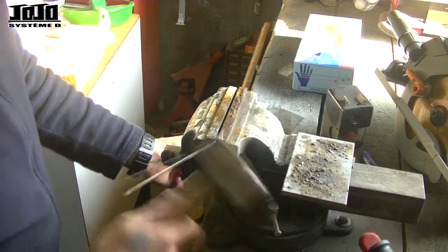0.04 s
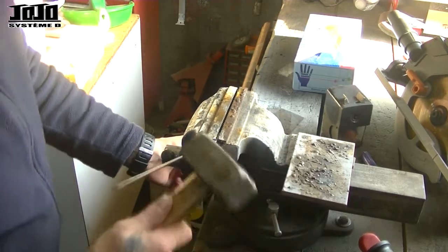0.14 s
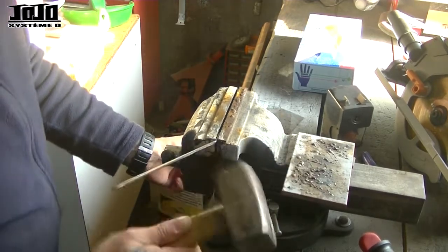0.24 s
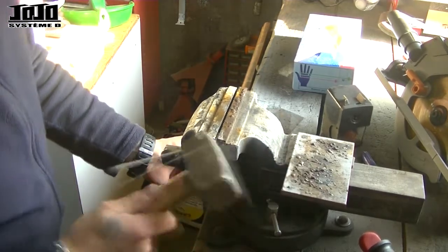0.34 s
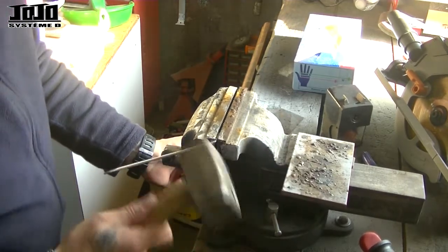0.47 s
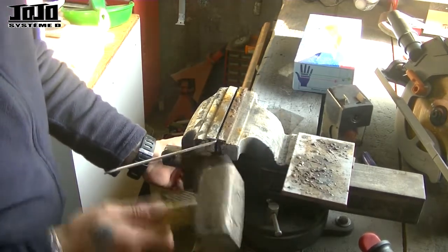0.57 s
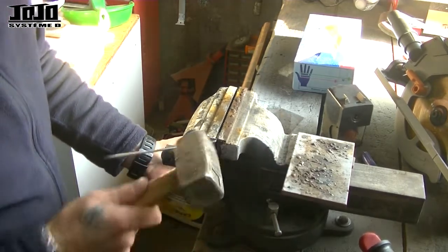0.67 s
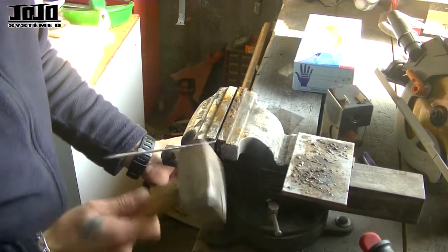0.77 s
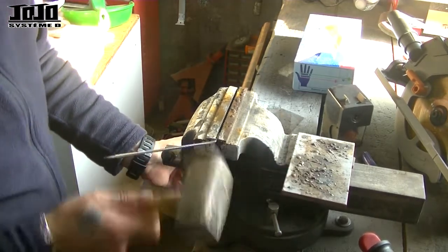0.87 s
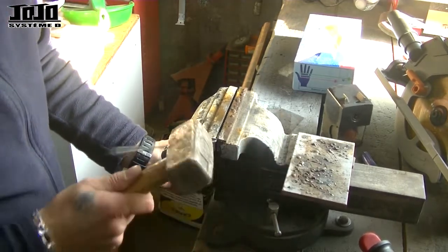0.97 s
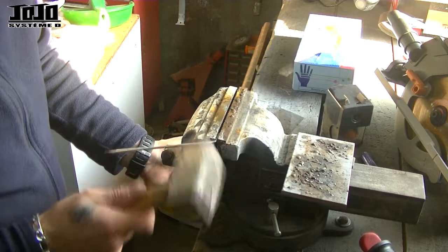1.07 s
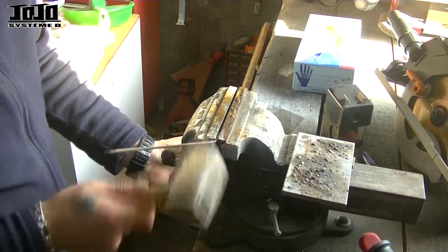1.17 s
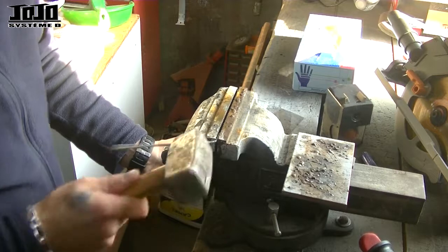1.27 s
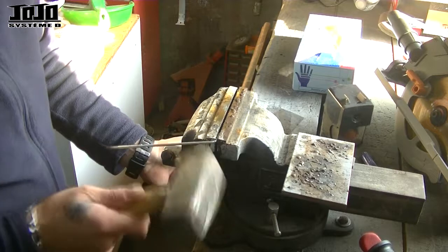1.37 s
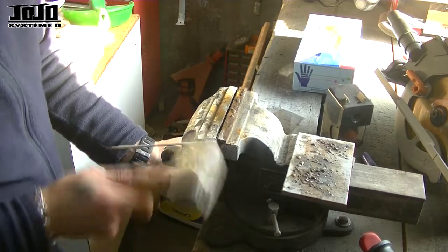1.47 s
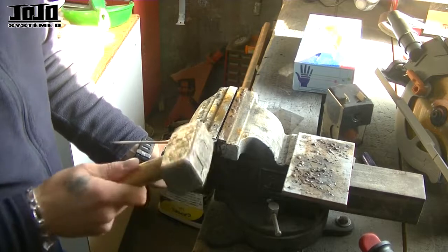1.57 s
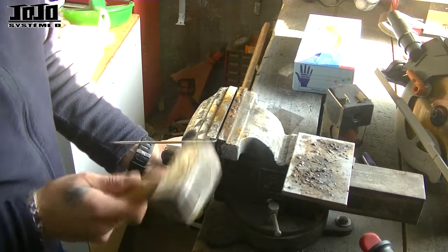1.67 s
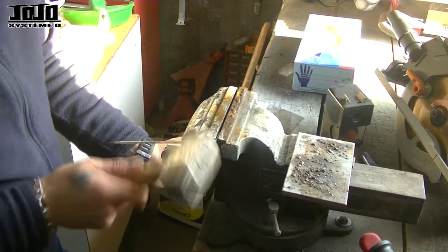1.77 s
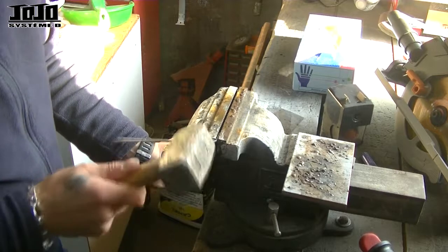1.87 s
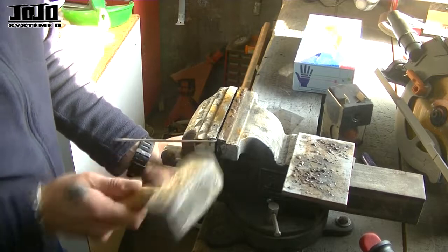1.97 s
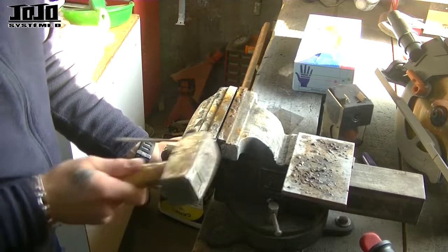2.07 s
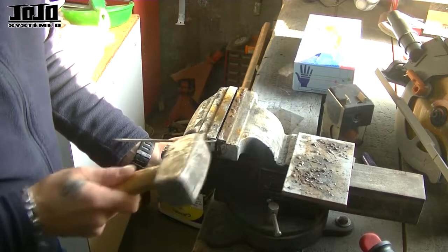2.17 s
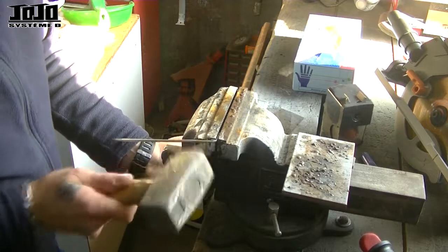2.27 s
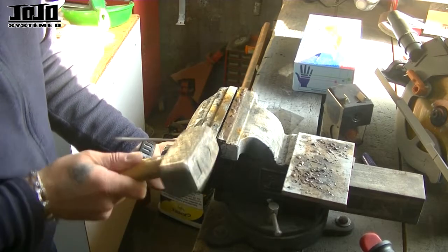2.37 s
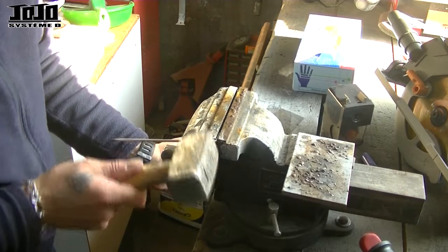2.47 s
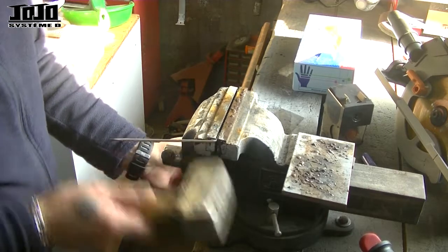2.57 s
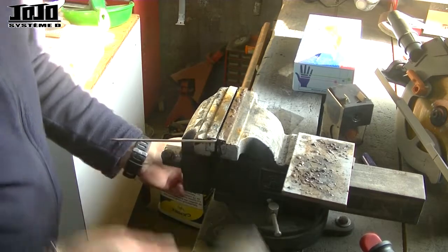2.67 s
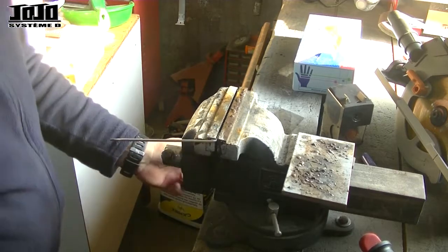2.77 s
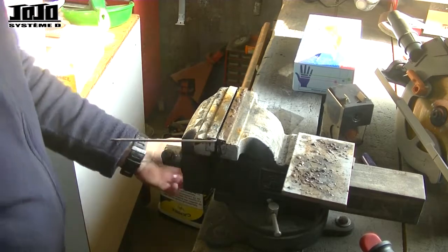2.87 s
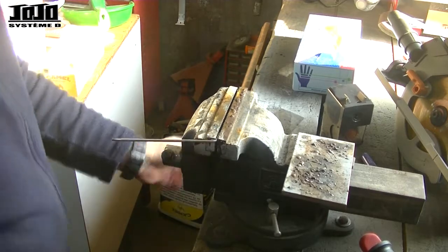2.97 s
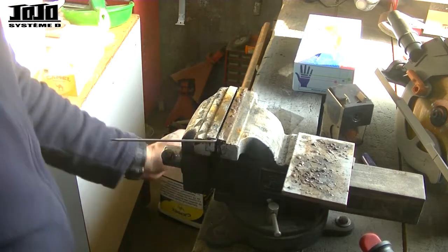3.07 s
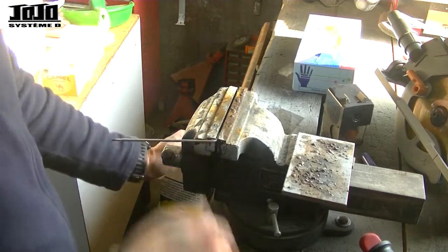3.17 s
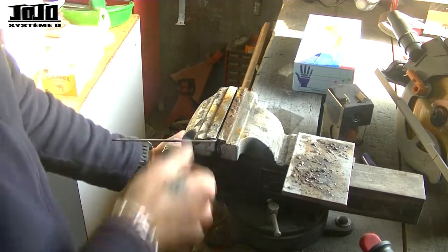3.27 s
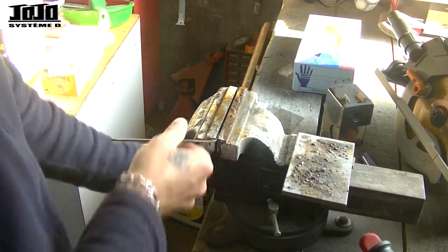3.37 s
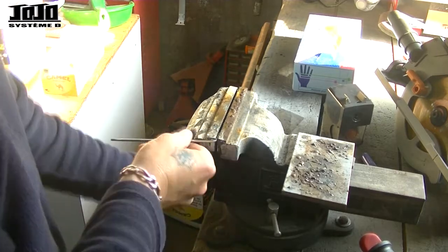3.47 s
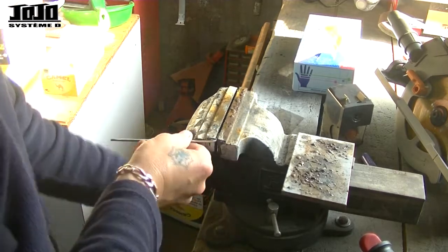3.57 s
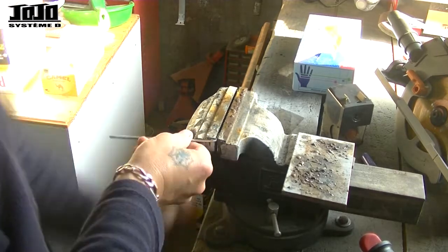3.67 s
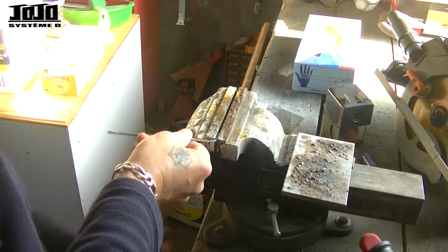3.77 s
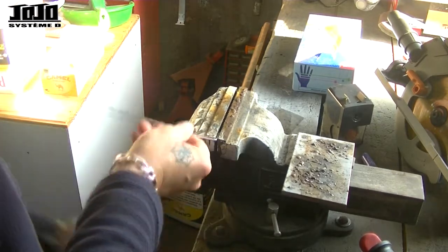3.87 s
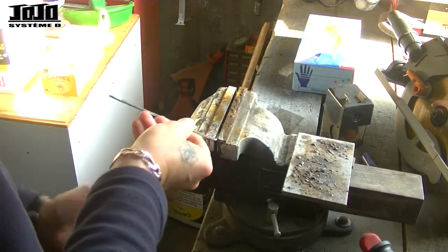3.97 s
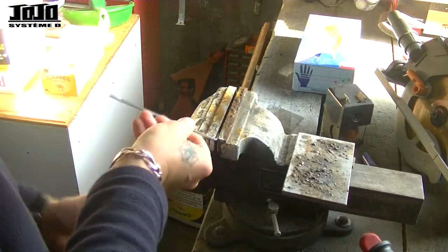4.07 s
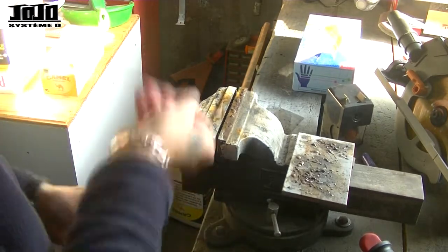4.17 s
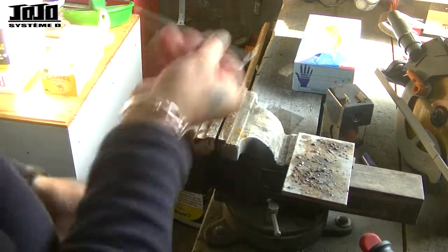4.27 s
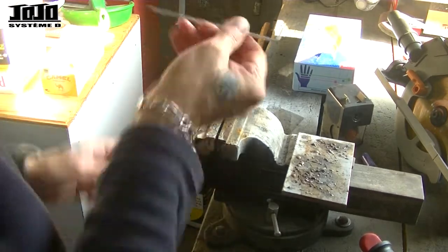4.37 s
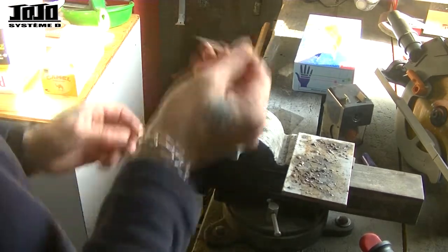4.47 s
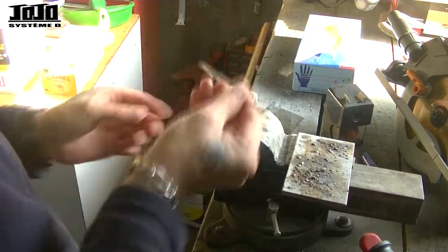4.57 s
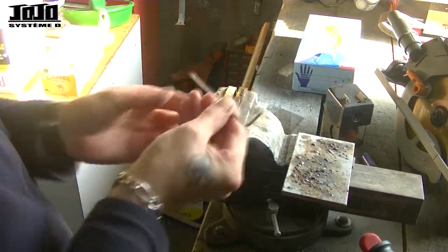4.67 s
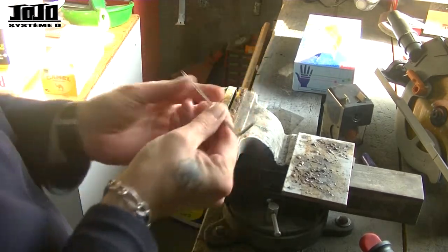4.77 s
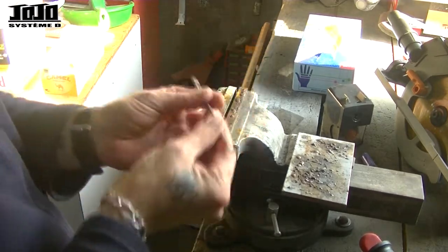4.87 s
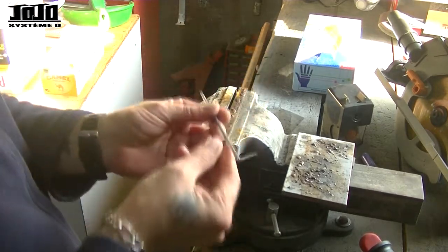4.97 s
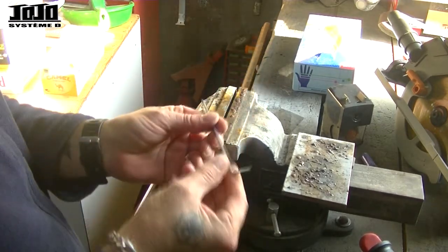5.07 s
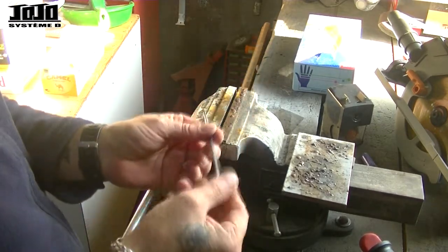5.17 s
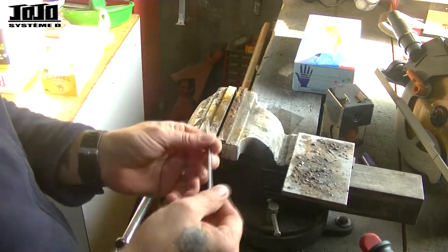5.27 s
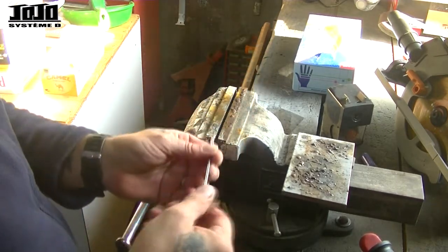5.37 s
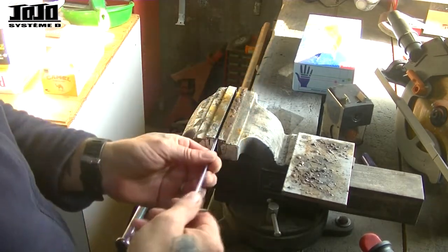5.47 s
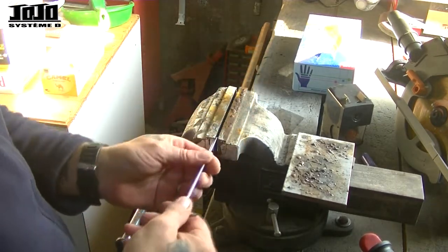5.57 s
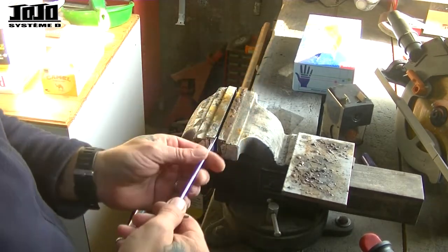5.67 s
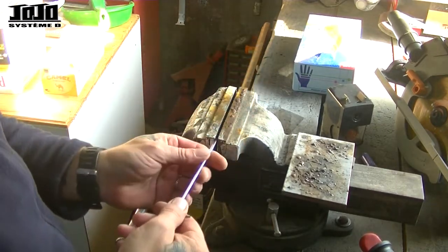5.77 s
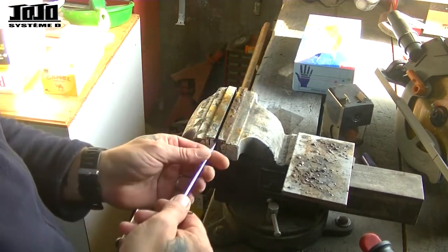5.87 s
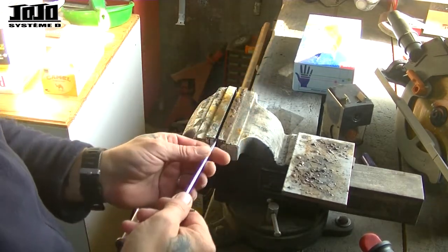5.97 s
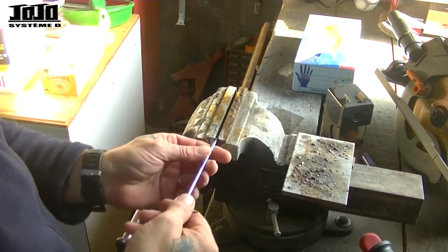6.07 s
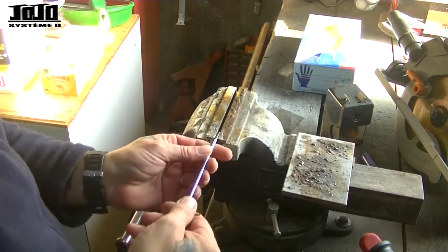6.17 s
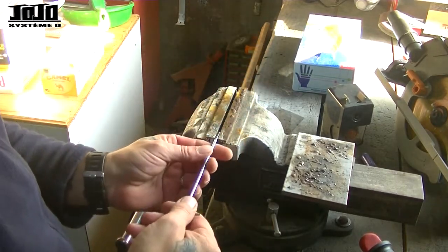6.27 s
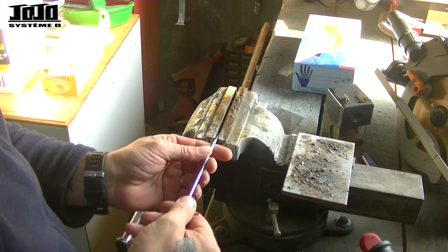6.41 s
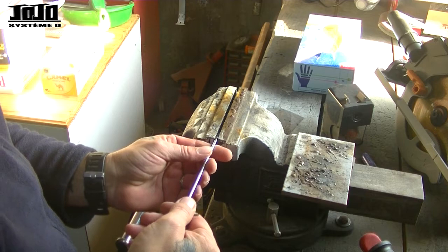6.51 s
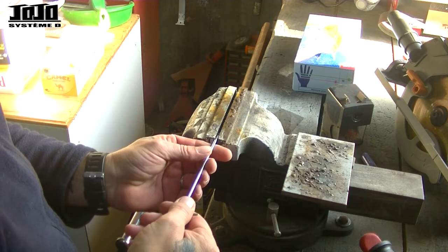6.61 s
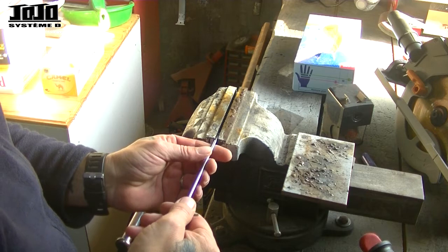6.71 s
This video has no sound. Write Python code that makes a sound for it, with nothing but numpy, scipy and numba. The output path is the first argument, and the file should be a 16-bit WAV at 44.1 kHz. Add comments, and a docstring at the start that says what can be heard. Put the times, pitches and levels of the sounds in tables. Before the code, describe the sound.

From the start, a hammer strikes a thin steel rod in a vise, nine sharp blows at about three a second, ending near 2.4 seconds. Each has a crack, a bright short ring and a slight bench thud, sounding a little squashed and growing harder as they go. A small steel tick follows at 2.7 seconds and a faint, high bracelet jingle at 2.9. The hammer touches the bench and lands with a loud clack at 3.1. Light ticks and faint scrapes lead to a cluster of louder clinks around 4.1 to 4.2 seconds as the rod comes out. Soft sliding follows near 5 seconds, then scattered small metal ticks from 5.5 to 6.6. The close stereo microphone catches the workshop's short echo, a steady low hiss, and faint rapid focus motor ticking near 3.9 seconds and again from 6 seconds.

```python
"""Sharp, ringing blows: a club hammer bends a thin steel rod over a vise jaw in a hard-walled workshop.
Each is a crack, ringing steel and a bench thud; then the hammer is dropped on the bench.
The rod is drawn out of the jaws and set in again with small steel ticks and scrapes.
A close stereo camera microphone adds hiss and its focus motor's steps, 25 a second;
its limiter squeezes every blow."""
import sys
import numpy as np
from scipy import signal
from scipy.fft import rfft, irfft, next_fast_len
from scipy.io import wavfile
from scipy.ndimage import uniform_filter1d
from numba import njit

SR = 44100
rng = np.random.default_rng(int(sys.argv[2]) if len(sys.argv) > 2 else 0)


def unload_wav(signal):
    """Save mono or channel-first audio to the path in sys.argv[1] as 16-bit WAV at rate SR, clipped to [-1, 1]."""
    wavfile.write(
        sys.argv[1],
        SR,
        np.round(np.clip(np.atleast_2d(signal).T, -1, 1) * 32767).astype(np.int16),
    )


N = 297406
PREROLL = SR // 2  # samples before time zero


def amp(db):
    """dB to gain."""
    return 10 ** (np.asarray(db) / 20)


def unit_rms(x):
    """Scale to rms 1."""
    return x / np.sqrt(np.mean(x ** 2) + 1e-20)


def curve(points, hz):
    """Interpolate (freq_hz, value) points on a log axis."""
    freqs, values = np.transpose(points)
    return np.interp(np.log(hz + 1), np.log(freqs + 1), values)


def filtered(x, response):
    """Apply a complex frequency response."""
    n = x.shape[-1]
    size = next_fast_len(n + 8192)
    return irfft(rfft(x, size) * response(np.fft.rfftfreq(size, 1 / SR)), size)[..., :n]


def resonances(peaks):
    """Response of (freq_hz, width_hz, level_db) band-passes of alternating sign."""
    return lambda hz: sum((-1) ** k * amp(db) * 1j * hz * width / (centre**2 - hz**2 + 1j * hz * width)
                          for k, (centre, width, db) in enumerate(peaks))


def stereo_pair(spectra, hz, correlation):
    """Mix two independent noise spectra to a given left-right correlation."""
    angle = np.arccos(np.clip(curve(correlation, hz), -1, 1))[:, None] / 2
    mid, side = np.cos(angle) * spectra[0], np.sin(angle) * spectra[1]
    return np.array([mid + side, mid - side])


def add(out, start_s, x):
    """Mix mono or stereo x into a track with preroll."""
    span = out[:, PREROLL + round(start_s * SR):][:, :x.shape[-1]]
    span += x[..., :span.shape[1]]


def onset(t, rise_s):
    """Soft start of a contact."""
    return (1 - np.exp(-t / rise_s)) ** 2


def ringing(modes, t, rise_s, scatter_db, blur_hz):
    """Damped sines of random strength; a wandering phase blurs each line."""
    hz, db, t60_s = np.transpose(modes)[:, :, None]
    db = db + scatter_db * rng.standard_normal(hz.shape)
    phase = rng.uniform(0, 2 * np.pi, hz.shape)
    hop = 64
    walks = np.cumsum(rng.standard_normal((len(modes), len(t) // hop + 1)), axis=1)
    walks *= np.sqrt(2 * np.pi * blur_hz * hop / SR)
    phase = phase + np.array([np.interp(np.arange(len(t)) / hop, np.arange(len(w)), w) for w in walks])
    return (amp(db - 60 * t / t60_s) * np.sin(2 * np.pi * hz * t + phase)).sum(0) * onset(t, rise_s)


def crack(t, rise_s, decay_s, colour_db):
    """Contact noise: a decaying burst, whitened, then coloured."""
    envelope = onset(t, rise_s) * amp(-60 * t / decay_s)
    spectrum = rfft(rng.standard_normal(len(t)) * envelope)
    hz = np.fft.rfftfreq(len(t), 1 / SR)
    power = uniform_filter1d(np.abs(spectrum) ** 2, size=round(150 * len(t) / SR))
    burst = irfft(spectrum / np.sqrt(np.abs(power)) * amp(colour_db(hz)), len(t))
    burst *= onset(t, rise_s / 2) * np.exp(-t / decay_s)
    return burst * np.linalg.norm(envelope) / np.linalg.norm(burst)


# room decay: freq_hz, t60_s
ROOM_T60 = [(150, 0.46), (500, 0.55), (1500, 0.57), (4000, 0.4), (8000, 0.44), (14000, 0.25)]
# room tail, left to right: freq_hz, correlation
ROOM_CORRELATION = [(60, 0.39), (180, 0.95), (550, 0.98), (1650, 0.78), (4970, 0.58), (15000, 0.18)]


def in_workshop(dry, wet_db, left_db=0, tail_samples=SR * 2 // 3):
    """Direct sound plus a fresh noise tail, each frequency dying at its own rate."""
    hz, t, noise = signal.stft(rng.standard_normal((2, tail_samples)), SR, nperseg=256)
    decay = amp(-60 * t / curve(ROOM_T60, hz)[:, None])
    impulse = signal.istft(stereo_pair(noise, hz, ROOM_CORRELATION) * decay, SR, nperseg=256)[1]
    impulse *= 1 - np.exp(-np.arange(impulse.shape[1]) / SR / 0.0011)  # reflections build up
    impulse *= amp(wet_db) / np.linalg.norm(impulse[0])
    impulse[:, 0] = 1  # direct path
    return signal.fftconvolve(dry[None], impulse, axes=1) * amp([[left_db / 2], [-left_db / 2]])


# microphone hiss and still air: freq_hz, density_db
HISS_SPECTRUM = [(40, -24), (150, -11), (340, -2), (450, -2), (710, -6), (1430, -5), (2970, -1), (5000, -3),
                 (10000, -8), (15300, -12), (16500, -22)]
# hiss, left to right: freq_hz, correlation
HISS_CORRELATION = [(60, -0.021), (380, -0.47), (2380, -0.11), (15000, -0.0069)]


def hiss(level_db=-57.3):
    """Steady noise of the two capsules."""
    hz, _, white = signal.stft(rng.standard_normal((2, PREROLL + N + 512)), SR, nperseg=1024)
    spectra = stereo_pair(white, hz, HISS_CORRELATION) * amp(curve(HISS_SPECTRUM, hz))[:, None]
    noise = signal.istft(spectra, SR, nperseg=1024)[1][:, :PREROLL + N]
    return amp(level_db) * noise / np.sqrt(np.mean(noise.mean(0) ** 2))


# lens barrel: freq_hz, level_db, t60_s
LENS_MODES = [(413, 1.5, 0.023), (647, -8.5, 0.12), (1027, -6.5, 0.097), (1403, 4, 0.055), (1555, 7, 0.052),
              (2080, 1.5, 0.057), (2526, 14, 0.023), (3060, 12, 0.034)]
# focus runs: start_s, step_count
MOTOR_RUNS = [(3.846, 6), (5.965, 15)]
# first steps of a run: level_db
RUN_UP_DB = [-38.5, -42, -54, -44]


def focus_motor(first_gap_s=0.053, step_s=0.0397, cruise_db=-51.5):
    """A bright kick, then soft, evenly spaced steps ring the lens barrel; no room."""
    out, t = np.zeros((2, PREROLL + N)), np.arange(SR // 8) / SR
    for start_s, step_count in MOTOR_RUNS:
        for k in range(step_count):
            delay_s = first_gap_s + (k - 1) * step_s if k else 0
            level_db = RUN_UP_DB[k] if k < len(RUN_UP_DB) else cruise_db + 3 * rng.standard_normal()
            db_per_octave = -5 if k else 3
            modes = [(hz, db + db_per_octave * np.log2(hz / 900), t60) for hz, db, t60 in LENS_MODES]
            colour = lambda hz: (db_per_octave + 2) * np.log2((hz + 300) / 900) * (hz > 600)
            step = ringing(modes, t, rise_s=0.002, scatter_db=3, blur_hz=49.4)
            step += amp(-1) * crack(t, 0.0014, 0.024, colour)
            step /= np.abs(step).max()
            add(out, start_s + delay_s, amp(level_db + 6) * step * amp([[0.4], [-0.4]]))
    return out


# bench top: freq_hz, width_hz, level_db
BENCH_MODES = [(181, 14, -8.5), (242, 41, -14), (344, 44, 2.5), (464.4, 244, -0.5), (930, 415, 0.5)]


def bench_thud(t):
    """One short push into the bench top."""
    knock = filtered(np.exp(-t / 0.00031), resonances(BENCH_MODES))
    return knock / np.abs(knock).max()


def bench_rumble(t, t60_s=0.1):
    """The bench top shakes under a heavy weight."""
    shake = rng.standard_normal(len(t)) * onset(t, 0.0099) * amp(-60 * t / t60_s)
    wood = filtered(shake, lambda hz: resonances(BENCH_MODES)(hz) / (1 + 1j * hz / 450))
    return wood / np.abs(wood).max()


# rod and vise jaws: freq_hz, level_db, t60_s
JAW_MODES = [(1855, 7.5, 0.04), (2877, 3, 0.081), (3200, 0, 0.065), (3775, -1.5, 0.11), (4205, -1.5, 0.04),
             (4310, 3.5, 0.034), (4825, -0.5, 0.074), (5300, -4, 0.21), (5700, -3.5, 0.13),
             (7040, 1, 0.014), (7700, 1, 0.025), (9100, -16, .04), (12600, -15, .04)]
# the hammer settles, the vise opens, the rod comes out and slides through the fingers:
# start_s, rise_s, fall_s, level_db, bench_db, centre_hz
SCRAPES = [(3.036, 0.028, 0.026, -36.5, 6, 3580), (3.6, 0.036, 0.98, -52.5, -13, 4160),
           (3.779, .05, 0.3, -54, -16, 3530), (4.07, 0.035, 0.25, -39.5, -3, 2770),
           (4.95, 0.27, 1.0, -52.5, -30, 4100)]


def scrapes(swing_db=28, grit_db=3.5):
    """Rough contact: noise with a grainy envelope excites the steel and the bench."""
    out, t = np.zeros((2, PREROLL + N)), np.arange(SR) / SR
    for start_s, rise_s, fall_s, level_db, bench_db, centre_hz in SCRAPES:
        peaks = [(hz, 200, db - 16 * abs(np.log2(hz / centre_hz))) for hz, db, _ in JAW_MODES]
        grains = unit_rms(uniform_filter1d(rng.standard_normal(len(t)), size=90))
        grit = rng.standard_normal((2, len(t))) * amp(grit_db * grains)
        steel = unit_rms(filtered(grit[0], resonances(peaks)))
        wood = unit_rms(filtered(grit[1], resonances(BENCH_MODES)))
        stroke_db = level_db - swing_db * np.maximum((rise_s - t) / rise_s, (t - rise_s) / fall_s) ** 2
        stroke = amp(stroke_db - 5.5) * (steel + amp(bench_db) * wood)
        add(out, start_s, in_workshop(stroke, wet_db=-0.7, left_db=2.2))
    return out


# bracelet links: freq_hz, level_db, t60_s
LINK_MODES = [(9700, -14, 0.023), (14200, -7, 0.016), (14900, -7, .02)]
# links touch: start_s, level_db
LINK_TOUCHES = [(2.897, -37), (2.905, -36), (2.912, -31), (2.917, -44)]


def bracelet():
    """Links touch in one brief, high jingle."""
    out, t = np.zeros((2, PREROLL + N)), np.arange(SR // 6) / SR
    for start_s, level_db in LINK_TOUCHES:
        ring = ringing(LINK_MODES, t, rise_s=0.00064, scatter_db=3, blur_hz=90)
        add(out, start_s, amp(level_db) * ring)
    return out


# small steel contacts: start_s, level_db, centre_hz, rise_ms
TICKS = [(2.6544, -22.5, 3900, 1.4), (2.6944, -34, 2960, 0.6), (2.9244, -46, 2390, 0.55),
         (3.4436, -43, 4400, 0.97), (3.5149, -40, 4440, 1.9), (3.5374, -45, 3500, 1.4),
         (3.6142, -36, 3740, 1.1), (3.7993, -35, 3160, 0.78), (4.098, -23, 3350, 2.2),
         (4.105, -11.5, 2860, 5.1), (4.148, -24, 3220, 2.8), (4.2, -14.5, 4200, 0.78),
         (4.2268, -11, 3440, 1.2), (4.2894, -46, 3000, 1.7), (5.506, -29.5, 4240, 0.78),
         (5.5922, -39, 3100, 2.4), (5.6471, -36, 5300, 0.55), (5.7758, -32, 4640, 4),
         (5.7877, -34, 3850, 2.2), (5.8501, -37.5, 3800, 2.2), (5.8755, -35.5, 3740, 2.4),
         (5.9254, -31.5, 3960, 2.7), (6.0312, -26.5, 4740, 1.5), (6.1285, -41, 2920, 2.5),
         (6.1539, -29.5, 4630, 2.8), (6.4557, -40, 3800, 1.2), (6.6019, -36.5, 3770, 4.3)]


def rod_ticks(held_from_s=4.6):
    """Light contacts ring the steel modes near centre_hz; softer ones click duller."""
    out, t = np.zeros((2, PREROLL + N)), np.arange(SR // 6) / SR
    for start_s, level_db, centre_hz, rise_ms in TICKS:
        rise_s = rise_ms / 1000
        t60_scale = 0.91 if start_s < held_from_s else 0.74  # loose in the jaws, then in the fingers
        rolloff_db = lambda hz: -16 * np.abs(np.log2((hz + 1) / centre_hz))
        modes = [(hz, db + rolloff_db(hz), t60 * t60_scale) for hz, db, t60 in JAW_MODES]
        ring = amp(-9.5) * ringing(modes, t, rise_s, scatter_db=2.4, blur_hz=40)
        click = amp(-6) * crack(t, rise_s, 0.041, lambda hz: (0.7 + 0.25 * rise_ms) * rolloff_db(hz))
        tick = in_workshop(ring + click, wet_db=-4, left_db=1.5, tail_samples=SR // 3)
        add(out, start_s, amp(level_db) * tick)
    return out


# hammer on the bench: freq_hz, density_db
DROP_SPECTRUM = [(60, -78.5), (170, -49.5), (340, -27.5), (880, -0.5), (2600, -5), (3400, 4), (4100, -7.5),
                 (4850, 4), (5800, -8), (9600, -21), (10300, -27), (12000, -31), (16500, -35)]
# bench contacts: start_s, level_db, rumble_db, db_per_octave
DROPS = [(2.964, -25.5, -5, -0.3), (3.0922, -2.5, -15.5, -0.3)]


def hammer_drop():
    """The hammer touches the bench, then lands: each a crack over a wooden rumble."""
    out, t = np.zeros((2, PREROLL + N)), np.arange(SR // 2) / SR
    for start_s, level_db, rumble_db, db_per_octave in DROPS:
        colour = lambda hz: curve(DROP_SPECTRUM, hz) + db_per_octave * np.log2((hz + 50) / 2000)
        impact = crack(t, 0.000083, 0.024, colour) + amp(rumble_db) * bench_rumble(t)
        add(out, start_s, amp(level_db) * in_workshop(impact, wet_db=0.73))
    return out


# rod modes: freq_hz
ROD_HZ = [1890, 1942, 2000, 2045, 3100, 3610, 3728, 3757, 3935, 4520, 5795, 6190, 6955, 7190, 7285, 7800]
# same modes: level_db, t60_s
ROD_DECAYS = [(-17, 0.24), (-1, 0.28), (-4, 0.28), (-7, 0.3), (-12.5, 0.34), (-6, 0.085), (0.5, 0.18),
              (3, 0.23), (-22, 0.43), (-4.5, 0.11), (-0.5, 0.39), (-6, 0.24), (2, 0.26), (-0.5, 0.17),
              (-0.5, 0.083), (-1.5, 0.21)]
# same modes, those of one group ring up together: group_index
ROD_GROUPS = [0, 0, 0, 0, 1, 1, 0, 1, 1, 1, 2, 2, 2, 1, 1, 0]
# hammer head: freq_hz, level_db, t60_s
HEAD_MODES = [(11840, -47, .65), (13790, -49, .35)]


def steel_ring(t, rise_s, group_db):
    """The rod's wavering modes plus the hammer head's clear, high ring."""
    modes = [(hz, db + group_db[group], t60)
             for hz, group, (db, t60) in zip(ROD_HZ, ROD_GROUPS, ROD_DECAYS)]
    rod = amp(-27.5) * ringing(modes, t, rise_s, scatter_db=1.8, blur_hz=28)
    return rod + ringing(HEAD_MODES, t, rise_s, scatter_db=1.8, blur_hz=9)


# blow on the free rod: freq_hz, density_db
FREE_SPECTRUM = [(60, -21), (150, -17.5), (410, -20), (1410, -12), (1950, -10), (3200, -7.5), (3750, -3.5),
                 (4300, -9.5), (5900, -6.5), (7300, -7), (9600, -7.5), (10200, -23.5), (11200, -15),
                 (15100, -14.5), (16500, -47.5)]
# blow through to the jaw: freq_hz, density_db
SEATED_SPECTRUM = [(60, -56), (180, -38.5), (800, -9.5), (1500, 5.5), (3860, 4.5), (5200, -5), (7000, -2.5),
                   (9600, -27), (10200, -15), (11200, -26), (13500, -14), (15500, -32.5), (16500, -31)]
# blows: start_s, level_db, seated_fraction, group0_db, group1_db, group2_db
BLOWS = [(-.178, 1, 0, 13, 5, 7.5), (0.1128, -2.5, 0.12, 6.5, 11.5, -28), (.389, -2, 0.2, 1, 6.5, -6),
         (0.68, -2, 0.18, 1.5, 7, -30), (.971, 2, 0.044, -0.5, 6.5, 2.5), (1.032, -17.5, 0.78, -25, 21, 14),
         (1.258, 1, 0.14, 0, 5.5, 0), (1.540, 2.5, 0.36, -7, 0.5, -4), (1.838, 3, 0.21, -20, 1, -0.5),
         (2.120, 7, 0.5, -18, -17.5, -35), (2.417, 5, 0.46, -10, 3.5, -7.5)]
# the face grazes the rod ahead of a blow: start_s, level_db
GRAZES = [(0.1083, -13.5), (0.677, -31), (1.241, -28), (1.829, -29.5), (2.107, -34), (2.412, -35)]


def hammer_blows(first_rise_ms=2.98, hardening_ms_per_s=1.06, thud_db=-18):
    """A crack that darkens as the rod seats on the jaw, ringing steel and a bench thud."""
    out, t = np.zeros((2, PREROLL + N)), np.arange(SR // 2) / SR
    free_colour = lambda hz: curve(FREE_SPECTRUM, hz)
    for start_s, level_db, seated, *group_db in BLOWS:
        rise_s = (first_rise_ms - hardening_ms_per_s * start_s) / 1000  # harder as the rod bends
        colour = lambda hz: (1 - seated) * free_colour(hz) + seated * curve(SEATED_SPECTRUM, hz)
        ring = steel_ring(t, rise_s, group_db)
        impact = crack(t, rise_s, 0.023 + 8 * rise_s, colour) + ring + amp(thud_db) * bench_thud(t)
        add(out, start_s, amp(level_db) * in_workshop(impact, wet_db=2.39))
        # extra dry ring keeps the steel tones clear and even
        add(out, start_s, amp(level_db + 4) * ring)
    for start_s, level_db in GRAZES:
        add(out, start_s, amp(level_db) * crack(t[:SR // 10], 0.0003, 0.089, free_colour))
    return out


# hammer balance: freq_hz, left_minus_right_db
HAMMER_BALANCE = [(60, -5.5), (120, 7.5), (240, 1.5), (480, 1.5), (950, 2), (1890, 2), (3770, 0.0),
                  (7520, 6), (15000, -3.5)]
# hammer phase: freq_hz, left_lead_rad
HAMMER_PHASE = [(3200, 0), (5250, -0.36), (6800, -1.4), (7750, -0.82), (9800, 1), (11000, -0.43)]


def hammer():
    """Blows and drop, reaching the two capsules at unequal level and phase."""
    sides = np.array([[0.5], [-0.5]])
    gain = lambda hz: amp(curve(HAMMER_BALANCE, hz) * sides)
    phase = lambda hz: curve(HAMMER_PHASE, hz) * sides
    return filtered(hammer_blows() + hammer_drop(), lambda hz: gain(hz) * np.exp(1j * phase(hz)))


def scene():
    """Stereo sum of all sources, preroll removed."""
    return (hammer() + rod_ticks() + bracelet() + scrapes() + focus_motor() + hiss())[:, PREROLL:]


@njit
def follow(level, attack_s, release_s):
    """One-pole envelope follower."""
    out = np.zeros(len(level))
    now = 0.0
    for i in range(len(level)):
        now += (level[i] - now) / (SR * (attack_s if level[i] > now else release_s))
        out[i] = now
    return out


def record(dry):
    """The limiter reacts late, so the first peaks saturate; then a low cut and a band limit."""
    threshold_db, ceiling, low_hz, top_hz = -7, 0.93, 130, 16800
    envelope = follow(np.abs(dry).max(0), attack_s=0.0008, release_s=0.033)
    limited = dry * np.maximum(envelope / amp(threshold_db), 1) ** -0.85
    saturated = limited / (1 + np.abs(limited / ceiling) ** 8) ** (1 / 8)
    low_cut = lambda hz: (1j * hz / low_hz) ** 2 / (1 + 1.4j * hz / low_hz - (hz / low_hz) ** 2)
    high_cut = lambda hz: (hz < top_hz) / (1 + (hz / 15700) ** 40)
    return filtered(saturated, lambda hz: low_cut(hz) * high_cut(hz))


dry = scene()
out = record(dry)
unload_wav(out)
```